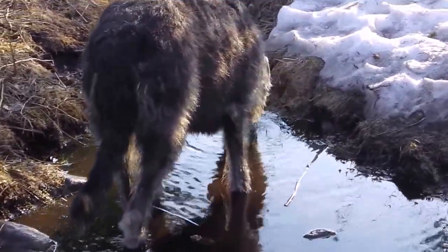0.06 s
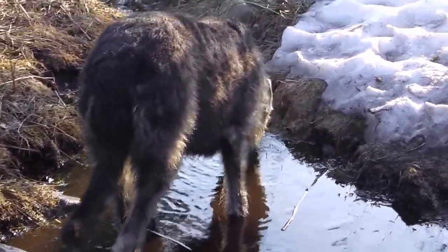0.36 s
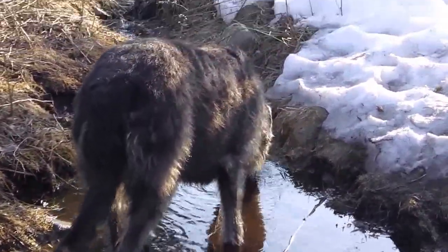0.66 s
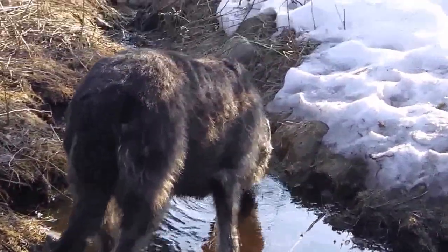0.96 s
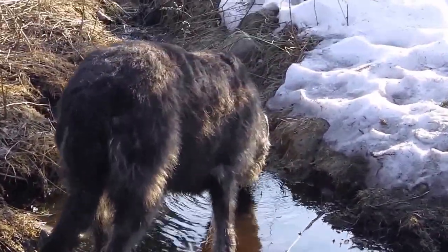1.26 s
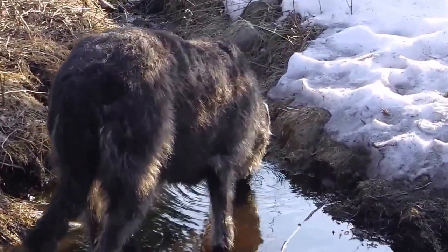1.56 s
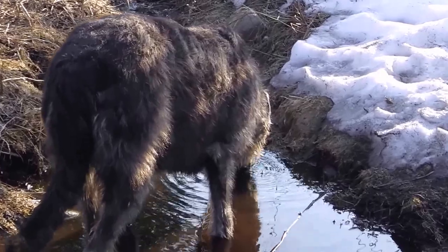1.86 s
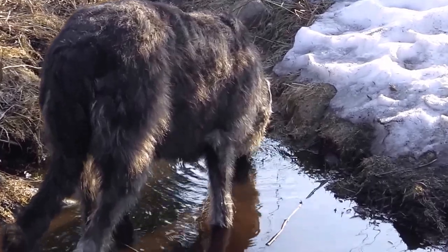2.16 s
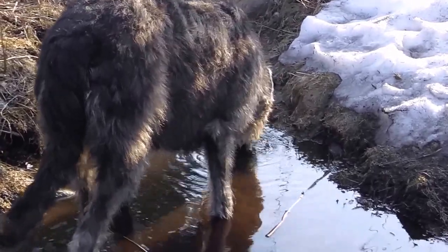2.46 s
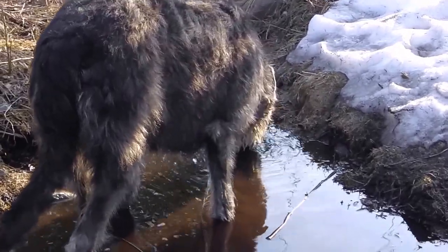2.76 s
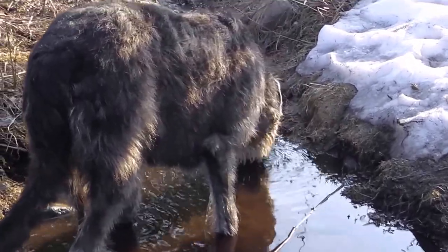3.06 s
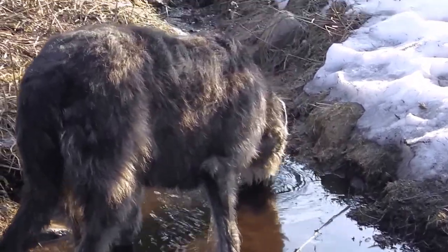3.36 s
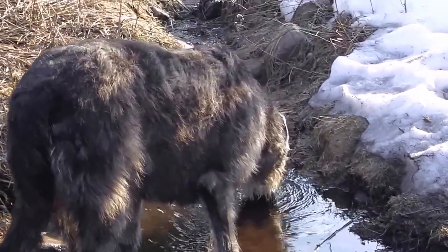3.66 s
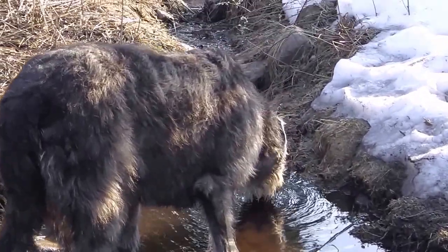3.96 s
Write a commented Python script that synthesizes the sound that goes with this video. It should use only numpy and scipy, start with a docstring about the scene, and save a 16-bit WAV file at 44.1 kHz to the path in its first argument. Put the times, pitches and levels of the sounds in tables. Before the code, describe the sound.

Wet, splashy lapping of a dog drinking from a stream, with faint birdsong behind.

```python
"""A shallow stream, where a dog a few metres away laps about three times a second.
Each lap is a splash of tiny bubbles, often with a bright tick of spray and loud pops of trapped air;
then water dribbles back from the muzzle. The stirred stream trickles faintly under open air.
A distant songbird sings a thin whistle, falling chirps, a rising whistle and a long buzz."""
import sys
import numpy as np
from scipy import signal
from scipy.fft import rfft, irfft, next_fast_len
from scipy.io import wavfile

SR = 44100
rng = np.random.default_rng(int(sys.argv[2]) if len(sys.argv) > 2 else 0)


def unload_wav(signal):
    """Save mono or channel-first audio to the path in sys.argv[1] as 16-bit WAV at rate SR, clipped to [-1, 1]."""
    wavfile.write(
        sys.argv[1],
        SR,
        np.round(np.clip(np.atleast_2d(signal).T, -1, 1) * 32767).astype(np.int16),
    )


N = 176400

# air pockets popping: start_s, ring_peak_db, pitch_hz, ring_cycles
POCKET_POPS = [(0.0265, -23, 1940, 13), (.181, -29, 1350, 9.6), (0.1962, -21.5, 1760, 9.6),
               (0.334, -33.5, 447, 6.2), (0.4777, -23, 2420, 19), (0.4901, -18, 1310, 2.5),
               (.628, -31.5, 3480, 72), (0.8273, -15, 1530, 5.1), (.869, -17.5, 1350, 4.8),
               (0.8816, -22.5, 685, 4.4), (1.177, -21.5, 2080, 33), (1.2365, -18, 1247, 18.4),
               (1.316, -26.5, 2720, 38), (1.549, -17.5, 1380, 7), (1.6291, -22, 1232, 53),
               (1.8524, -15.5, 1414, 11), (1.9341, -27, 1225, 47), (2.17, -17.5, 1790, 2.4),
               (2.1982, -27, 1560, 2.2), (2.2587, -25.5, 1330, 17), (2.315, -23.5, 3610, 46),
               (2.4083, -27, 1924, 44), (2.4968, -11, 2135, 13.6), (2.511, -21.5, 1850, 10),
               (2.575, -25.5, 1267, 32), (2.6253, -26, 2790, 35), (2.83, -30.5, 3000, 32),
               (2.8928, -23, 1330, 31), (2.9709, -28, 567, 13), (3.121, -37, 193, 5.3),
               (3.287, -28.5, 1190, 31), (3.3317, -22, 2830, 5.7), (3.3543, -22.5, 2730, 23),
               (3.5286, -17.5, 3380, 23), (3.8318, -23, 1140, 4.6), (3.8656, -20.5, 1385, 13.5),
               (3.917, -28, 1150, 29), (3.972, -24, 3510, 57)]
# flicks of spray: start_s, level_db, decay_s, ring_hz
SPRAY_TICKS = [(.148, -38, 0.015, 5200), (0.291, -37.5, 0.0058, 6570), (0.468, -32, 0.0038, 5230),
               (0.9253, -33.5, 0.0056, 9200), (1.131, -35, 0.013, 5330), (1.331, -33.5, 0.003, 7600),
               (1.528, -33, 0.0053, 7050), (1.6, -35, 0.011, 9100), (1.8252, -33, 0.013, 5600),
               (1.9677, -34, 0.0026, 7750), (2.076, -31, 0.002, 6540), (2.146, -27, 0.0068, 6400),
               (2.389, -31, 0.0013, 5040), (2.472, -26, 0.0044, 4900), (2.919, -34, 0.0015, 7000),
               (2.9488, -26.5, 0.0047, 5240), (3.1759, -31.5, 0.014, 5800), (3.4888, -31.5, 0.0056, 7220),
               (3.8822, -27, 0.0016, 9250)]
# the tongue slaps the water: start_s, relative_level_db, hold_s, low_body_db
TONGUE_LAPS = [(0.164, -31.5, 0.026, -2), (0.479, -36.5, 0.053, -15), (0.803, -39, 0.038, -4),
               (0.867, -35, 0.027, 8), (1.139, -34, 0.036, -7), (1.541, -32, 0.033, -1.5),
               (1.845, -29, 0.014, 0), (2.163, -32.5, 0.039, 6.5), (2.487, -31, 0.014, 0.5),
               (2.893, -30, 0.023, -1), (2.967, -25.5, 0.0049, 0), (3.197, -27, 0.023, -1.5),
               (3.509, -32.5, 0.021, -3.5), (3.829, -36.5, 0.028, -5)]
# water falls back from the muzzle: start_s, relative_level_db, hold_s
MUZZLE_DRIBBLES = [(0.249, -35, 0.0056), (.553, -38.5, 0.018), (0.591, -44, 0.059), (.942, -35, 0.0081),
                   (1.246, -40, 0.005), (1.291, -39.5, 0.036), (1.604, -39, 0.029), (1.697, -37.5, 0.0035),
                   (1.926, -38.5, 0.019), (1.987, -37.5, 0.016), (2.26, -44.5, 0.067),
                   (2.566, -42.5, 0.0062), (3.116, -42, 0.014), (3.274, -42.5, 0.0084), (3.59, -42, 0.091),
                   (3.907, -38, 0.014)]
# soft swells of fizzing droplets: centre_s, relative_level_db, half_length_s
FIZZ_SWELLS = [(0.445, -47.5, .018), (0.602, -51.5, 0.07), (0.82, -46, 0.044), (1.414, -45, 0.085),
               (1.91, -47, 0.096), (2.256, -47.5, 0.058), (2.944, -47.5, 0.05), (3.253, -50, 0.093),
               (3.593, -51.5, 0.075), (3.882, -49, 0.11)]
# the bird's falling chirps: fall_start_s, relative_level_db
BIRD_CHIRPS = [(1.42, -41), (1.486, -38), (1.552, -39), (1.619, -37), (1.686, -36.5), (1.761, -36)]
# the bird's held notes: time_s, centre_pitch_hz, relative_level_db
THIN_WHISTLE_CURVE = [(.11, 6500, -65), (0.14, 6250, -58), (.21, 5750, -65)]
RISING_WHISTLE_CURVE = [(1.935, 2710, -62), (1.97, 2903, -45), (2.01, 2815, -43), (2.04, 2924, -43),
                        (2.065, 3050, -60), (2.135, 3220, -50.5), (2.158, 4310, -38), (2.19, 4690, -40.5)]
BUZZ_CURVE = [(2.43, 3830, -53.5), (2.57, 4035, -48), (2.73, 4386, -45.5), (3.0, 4764, -45.5),
              (3.16, 4710, -48), (3.2, 4550, -45)]
# tone colour of each layer: frequency_hz, gain_db
AIR_EQ = [(20, -12.5), (60, -1), (240, -10.5), (450, -2), (1400, -0.5), (3800, -2), (5600, -7), (10400, -9),
          (15500, -16.5)]
GURGLE_EQ = [(200, 2.5), (420, 5), (1500, -34)]
SPLASH_EQ = [(150, -27), (280, -14), (430, -2.5), (800, -4.5), (1300, 1), (3200, -3.5), (3900, -7),
             (5000, -22.5), (15000, -34.5)]
SPRAY_EQ = [(2500, -24), (4500, 4), (10500, -3), (15000, -15)]
FIZZ_EQ = [(3000, 6.5), (5000, 4), (10000, 0), (15500, -7.5)]
# stereo width of the air, and of the dog and bird: frequency_hz, side_gain_db
AIR_SIDE_EQ = [(40, -1), (1400, -12), (3000, -6), (7000, -1.5), (12000, 3)]
SOURCE_SIDE_EQ = [(150, -14), (1300, -34), (2500, -25), (4000, -13.5), (12000, 0)]

AIR_DB, GURGLE_DB, TRICKLE_DB, SETTLE_S = -49, -59, -45, 0.35
POP_ATTACK_S, POP_RISE_PER_S = 0.0011, 1.3   # rise as a share of the pitch
SQUEEZE_LEAD_S, SQUEEZE_DB = 0.006, -10
SPLAT_DECAY_S, SPLAT_LOSS_DB_PER_S = 0.0029, 459   # the longer the ring, the cleaner the pop
TICK_ATTACK_S, TICK_RING_DB = 0.0056, 7
SPLASH_ATTACK_S, SPLASH_RELEASE_S, WASH_DB = 0.0006, 0.011, -9
FIZZ_FLICKER_DB, MIST_DB = 3.5, -6
SLUR_S, SLUR_RISE_HZ, SLUR_DB = 0.032, 416, -13
CHIRP_S, CHIRP_TOP_HZ, CHIRP_FALL_HZ, CHIRP_FLUTTER_DB = 0.046, 3940, 793, 2.5
BUZZ_SWEEPS_PER_S, BUZZ_SWING_HZ, BUZZ_THROB = 190, 915, 0.58
BANK_ECHO_DB, WOODS_ECHO_DB = -7.5, -5
CUTOFF_HZ = 15900


def from_db(db):
    """Decibels to gain."""
    return 10 ** (np.asarray(db) / 20)


def unit_rms(x):
    """Scale to unit rms."""
    return x / np.sqrt(np.mean(x ** 2) + 1e-20)


def seconds(length):
    """A time axis."""
    return np.arange(int(length * SR)) / SR


def add(out, start_s, x):
    """Mix a sound in at its cue."""
    i = max(int(start_s * SR), 0)
    out[..., i:i + x.shape[-1]] += x[..., :max(N - i, 0)]


def wobble(span_s):
    """Smooth random motion of unit spread."""
    window = np.hanning(int(span_s * SR) + 3)
    return unit_rms(signal.fftconvolve(rng.standard_normal(N), window, "same"))


def eq(x, curve):
    """Minimum-phase EQ along a curve of frequency_hz, gain_db."""
    n = x.shape[-1]
    size = 2 * next_fast_len(n // 2 + 1024)
    hz, db = np.transpose(curve)
    bins_hz = np.fft.rfftfreq(size, 1 / SR)
    gain = from_db(np.interp(np.log(bins_hz + 1e-9), np.log(hz), db))
    cepstrum = irfft(np.log(gain))
    cepstrum[1:size // 2] *= 2
    cepstrum[size // 2 + 1:] = 0
    return irfft(rfft(x, size) * np.exp(rfft(cepstrum)))[..., :n]


def stereo(mid, side, side_eq):
    """Left and right from a mid and an equalised side."""
    side = eq(side, side_eq)
    return np.array([mid + side, mid - side])


def clicks(size, per_s, spread_db):
    """Random impulses, mostly small."""
    hits = (rng.random(size) < per_s / SR) * rng.choice([-1, 1], size)
    return hits * from_db(spread_db * np.minimum(rng.exponential(1, size), 4))


def echoes(x, decay_s, per_s):
    """A dying tail of scattered reflections."""
    t = seconds(.5)
    tail = clicks(len(t), per_s, 0.52) * np.exp(-t / decay_s) * (t > .002)
    return signal.fftconvolve(x, tail / np.sqrt(np.sum(tail ** 2) + 1e-20))[:N]


def bubbles(size, per_s, spread_db, cycles, low_hz=330, high_hz=4300, count=24):
    """Each impulse rings a bubble of random pitch, which dies by 60 dB over its cycles."""
    hits = clicks(size, per_s, spread_db)
    chosen = rng.integers(0, count, size)
    pitches = np.geomspace(low_hz, high_hz, count) * rng.uniform(.95, 1.05, count)
    out = 0
    for k, hz in enumerate(pitches):
        radius, angle = from_db(-60 * hz / (cycles * SR)), 2 * np.pi * hz / SR
        poles = [1, -2 * radius * np.cos(angle), radius * radius]
        out = out + angle * signal.lfilter([1, 0, -1], poles, hits * (chosen == k) + 1e-18)
    return unit_rms(out)


def glide(curve):
    """A note's pitch and level at every sample."""
    times, *columns = np.transpose(curve)
    return [np.interp(times[0] + seconds(times[-1] - times[0]), times, c) for c in columns]


def bird_tone(hz):
    """A sine of unit rms; fast pitch flutter gives it a slight rasp."""
    rasp = 1 + 0.011 * wobble(0.0023)[:len(hz)]
    return np.sqrt(2) * np.sin(2 * np.pi * np.cumsum(hz * rasp) / SR)


def open_air():
    """A steady, wide bed of soft noise."""
    mid, side = unit_rms(eq(rng.standard_normal((2, N)), AIR_EQ))
    return from_db(AIR_DB) * stereo(mid, side, AIR_SIDE_EQ)


def stream():
    """Low bubbles gurgle throughout; each lap stirs up a trickle that settles again."""
    t = np.arange(N) / SR
    stirred = np.max([(t > s) * np.exp(-abs(t - s) / SETTLE_S) for s, *_ in TONGUE_LAPS], axis=0)
    trickle = eq(bubbles(N, per_s=700, spread_db=4, cycles=40), SPLASH_EQ)
    gurgle = eq(bubbles(N, per_s=65, spread_db=0.5, cycles=14, low_hz=59.2, high_hz=629), GURGLE_EQ)
    return from_db(TRICKLE_DB) * stirred * unit_rms(trickle) + from_db(GURGLE_DB) * unit_rms(gurgle)


def pops():
    """Water squeezes shut, then an air pocket rings briefly, rising in pitch, with a wet splat."""
    out, t = np.zeros(N), seconds(.06)
    attack = 1 - np.exp(-(t / POP_ATTACK_S) ** 2)
    for start_s, db, hz, cycles in POCKET_POPS:
        phase = 2 * np.pi * hz * (t + POP_RISE_PER_S * t * t / 2)
        ring = np.sin(phase) * attack * from_db(-60 * t * hz / cycles)
        water = eq(rng.standard_normal((2, len(t))) * attack * np.exp(-t / SPLAT_DECAY_S), SPLASH_EQ)
        low_cut = signal.butter(2, 0.16 * hz, "high", fs=SR, output="sos")   # small pockets, less body
        splat, squeeze = signal.sosfilt(low_cut, water)
        wetness = from_db(-SPLAT_LOSS_DB_PER_S * cycles / hz)
        add(out, start_s, from_db(db) * (ring / abs(ring).max() + wetness * splat / abs(splat).max()))
        add(out, start_s - SQUEEZE_LEAD_S, from_db(db + SQUEEZE_DB) * squeeze / abs(squeeze).max())
    return out


def whistle(curve):
    """One gliding bird note."""
    hz, db = glide(curve)
    return from_db(db) * bird_tone(hz)


def spray():
    """Flicked droplets: bright, grainy ticks of noise, each with its own resonance."""
    out, t = np.zeros((2, N)), seconds(.1)
    grain = from_db(3.5 * wobble(.002))
    for start_s, db, decay_s, hz in SPRAY_TICKS:
        decay = np.exp(-t / decay_s)
        drops = rng.standard_normal((2, len(t))) * (1 - np.exp(-t / TICK_ATTACK_S)) * decay
        drops *= grain.take(int(start_s * SR) + np.arange(len(t)), mode="wrap")
        resonance = [(hz / 1.15, 0), (hz, TICK_RING_DB), (hz * 1.15, 0)]
        drops = eq(eq(drops, SPRAY_EQ), resonance)
        add(out, start_s, from_db(db) * np.sqrt(np.mean(decay ** 2)) * unit_rms(drops))
    return stereo(*out, SOURCE_SIDE_EQ)


def splashes(cues, per_s, spread_db, cycles):
    """Lumpy bursts of bubbles over a faint wash of droplets: quick attack, hold, release."""
    out, t = np.zeros(N), seconds(.16)
    lumps = from_db(4 * wobble(.005))
    for start_s, db, hold_s, body_db in cues:
        water = bubbles(len(t), per_s, spread_db, cycles)
        water += from_db(WASH_DB) * rng.standard_normal(len(t))
        water *= lumps.take(int(start_s * SR) + np.arange(len(t)), mode="wrap")
        attack = np.minimum(t / SPLASH_ATTACK_S, 1)
        envelope = attack * np.exp(-np.maximum(t - hold_s, 0) / SPLASH_RELEASE_S)
        low_shelf = [(500, body_db), (1200, 0)]
        water = eq(eq(water * envelope, SPLASH_EQ), low_shelf)
        add(out, start_s, from_db(db) * np.sqrt(np.mean(envelope ** 2)) * unit_rms(water))
    return out


def laps():
    """The tongue slaps up a dense burst of bubbles; a deeper scoop has more body."""
    return from_db(-2) * splashes(TONGUE_LAPS, per_s=2600, spread_db=2.5, cycles=21.6)


def dribbles():
    """Water falls from the muzzle in sparser, longer-ringing bubbles."""
    cues = [(*row, 0) for row in MUZZLE_DRIBBLES]   # flat low shelf
    return from_db(-1.5) * splashes(cues, per_s=700, spread_db=3.5, cycles=53)


def fizz():
    """Swells of tiny, high-pitched droplets, clumping over a fine mist."""
    swell = sum(from_db(db) * np.exp(-((np.arange(N) / SR - centre_s) / half_s) ** 2 / 2)
                for centre_s, db, half_s in FIZZ_SWELLS)
    drops = np.array([bubbles(N, per_s=1600, spread_db=3, cycles=11, low_hz=4320, high_hz=14800)
                      for _ in range(2)])
    drops += from_db(MIST_DB) * rng.standard_normal((2, N))
    drops *= from_db(FIZZ_FLICKER_DB * wobble(.02))
    mid, side = from_db(3) * swell * unit_rms(eq(drops, FIZZ_EQ))
    return stereo(mid, side, SOURCE_SIDE_EQ)


def chirp():
    """A soft slur up to the top pitch, then a loud fall; pitch and strength waver."""
    up, down = seconds(SLUR_S) / SLUR_S, seconds(CHIRP_S) / CHIRP_S
    hz = CHIRP_TOP_HZ - np.r_[SLUR_RISE_HZ * (1 - up) ** 2, CHIRP_FALL_HZ * down ** 1.4]
    soft = from_db(SLUR_DB) * np.r_[np.sqrt(up), 1 - down]
    loud = np.r_[np.zeros(len(up)), np.sin(np.pi * down) * (1 - down / 2)]
    bend, flutter = wobble(.01)[:2 * len(hz)].reshape(2, -1)
    envelope = np.maximum(soft, loud) * from_db(CHIRP_FLUTTER_DB * flutter)
    return envelope * bird_tone(hz * (1 + .02 * bend))


def buzz():
    """A throbbing whistle swept fast and unevenly down and up, wider as it climbs."""
    hz, db = glide(BUZZ_CURVE)
    jitter = 1 + 0.0855 * wobble(0.00855)[:len(hz)]
    sweep = 2 * np.pi * np.cumsum(BUZZ_SWEEPS_PER_S * jitter) / SR
    swing_hz = BUZZ_SWING_HZ * (hz / hz.max()) ** 1.1
    throb = 1 + BUZZ_THROB * np.sin(sweep)
    return from_db(db) * throb * bird_tone(hz + swing_hz * np.cos(sweep))


def songbird():
    """The whole song, blurred by echoes from the trees."""
    song = np.zeros(N)
    for fall_s, db in BIRD_CHIRPS:
        add(song, fall_s - SLUR_S, from_db(db) * chirp())
    for curve in (THIN_WHISTLE_CURVE, RISING_WHISTLE_CURVE):
        add(song, curve[0][0], whistle(curve))
    add(song, BUZZ_CURVE[0][0], buzz())
    mid, side = [from_db(WOODS_ECHO_DB) * echoes(song, decay_s=.03, per_s=2000) for _ in range(2)]
    return from_db(2.5) * stereo(song + mid, song * .5 + side * 2.1, SOURCE_SIDE_EQ)


def stream_banks(water):
    """Short echoes from the banks give the water its space and width."""
    mid = water + from_db(BANK_ECHO_DB) * echoes(water, decay_s=0.0099, per_s=1500)
    side = echoes(water, decay_s=0.0031, per_s=3700)
    return stereo(mid, side, SOURCE_SIDE_EQ)


def scene():
    """The dog drinks up front; stream, air and bird sit behind."""
    dog = stream_banks(laps() + dribbles() + pops()) + spray() + fizz()
    return dog + stream() + open_air() + songbird()


def record(dry):
    """A steep high cut takes off the very top."""
    return signal.sosfilt(signal.ellip(10, .2, 80, CUTOFF_HZ, fs=SR, output="sos"), dry)


dry = scene()
out = record(dry)
unload_wav(out)
```